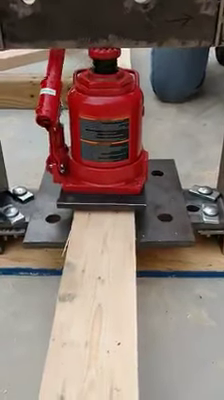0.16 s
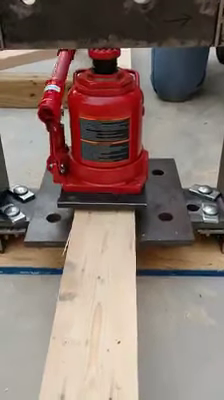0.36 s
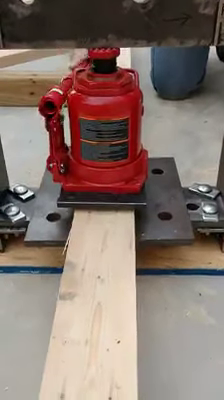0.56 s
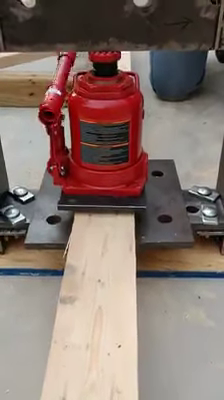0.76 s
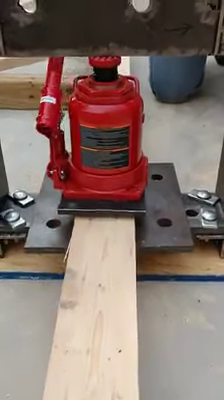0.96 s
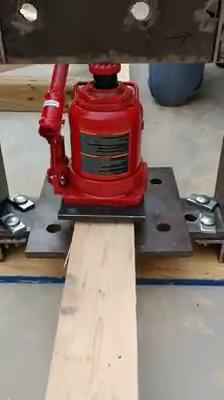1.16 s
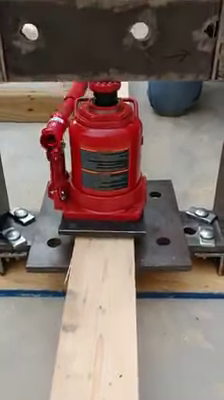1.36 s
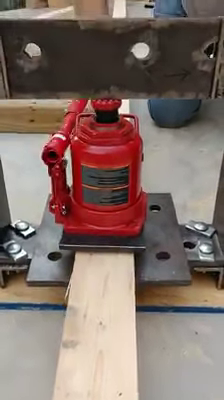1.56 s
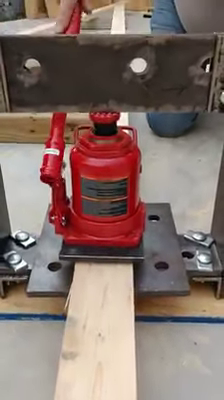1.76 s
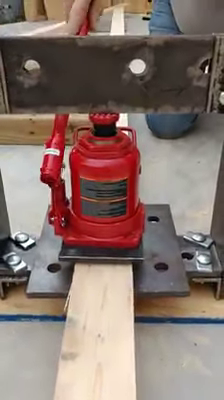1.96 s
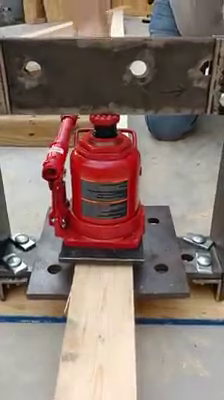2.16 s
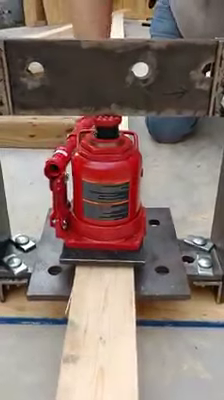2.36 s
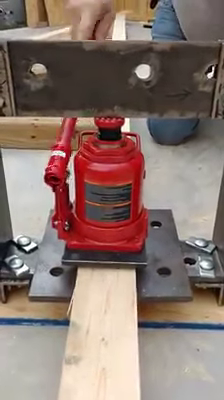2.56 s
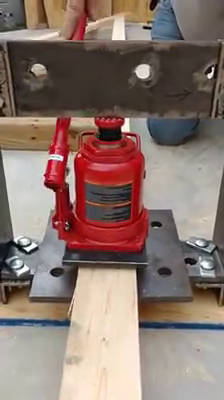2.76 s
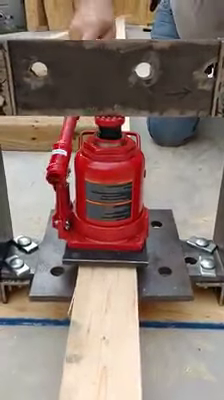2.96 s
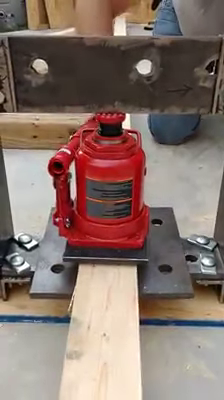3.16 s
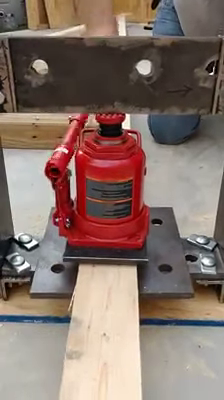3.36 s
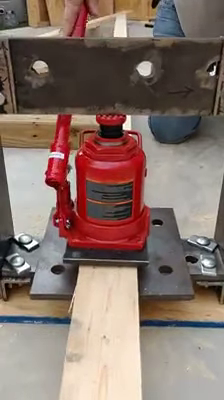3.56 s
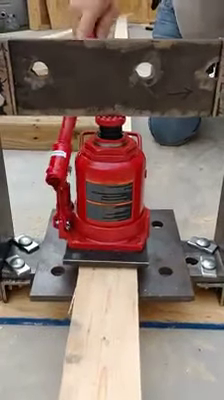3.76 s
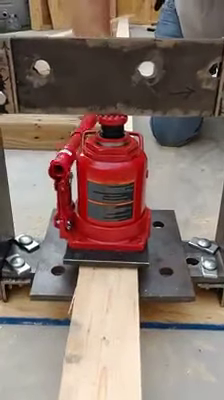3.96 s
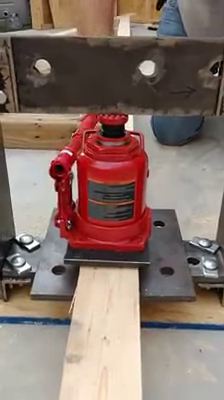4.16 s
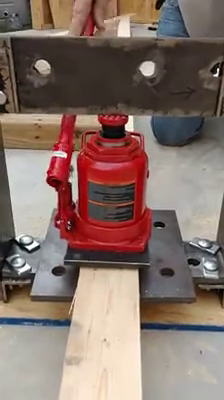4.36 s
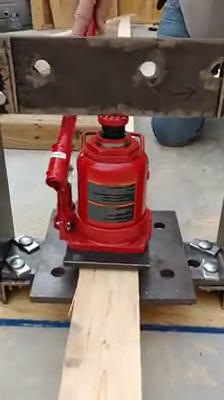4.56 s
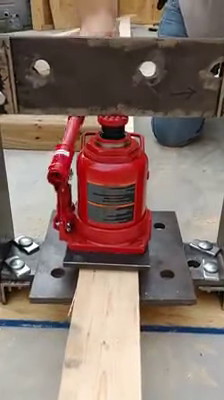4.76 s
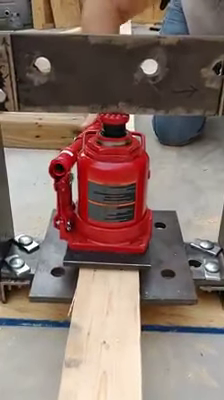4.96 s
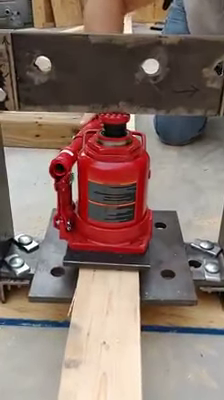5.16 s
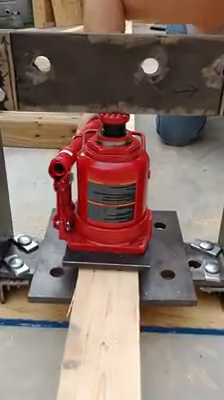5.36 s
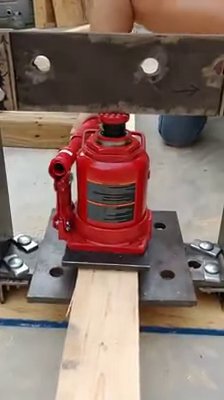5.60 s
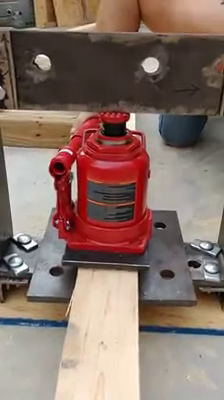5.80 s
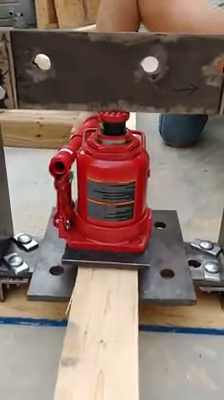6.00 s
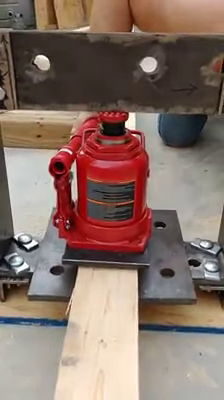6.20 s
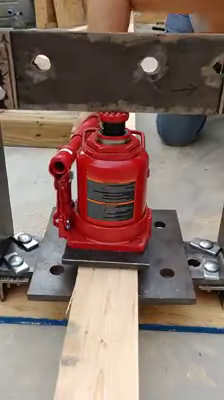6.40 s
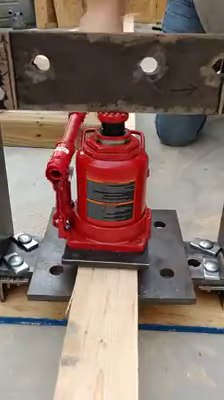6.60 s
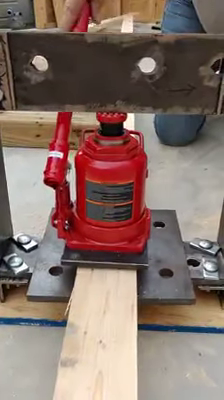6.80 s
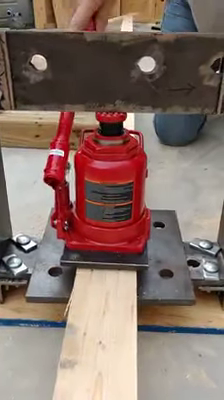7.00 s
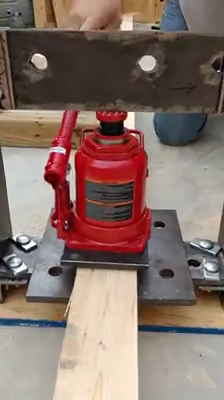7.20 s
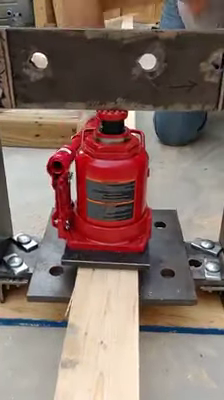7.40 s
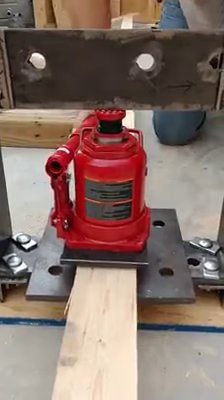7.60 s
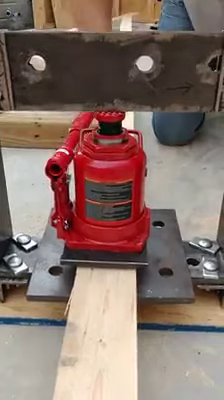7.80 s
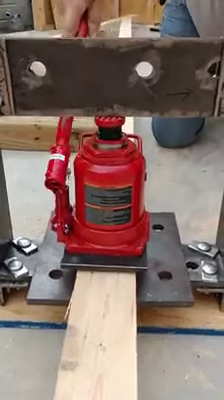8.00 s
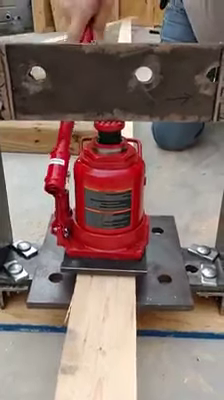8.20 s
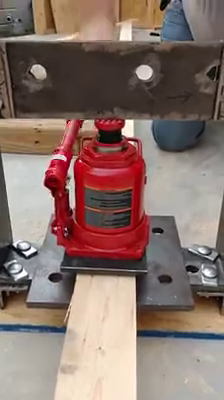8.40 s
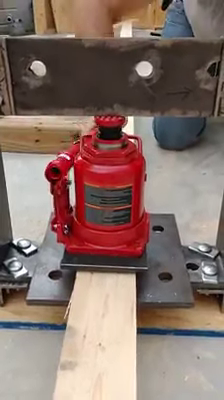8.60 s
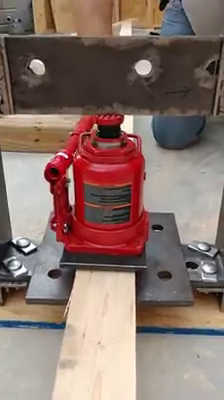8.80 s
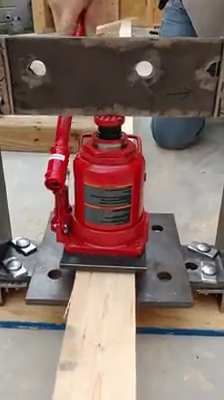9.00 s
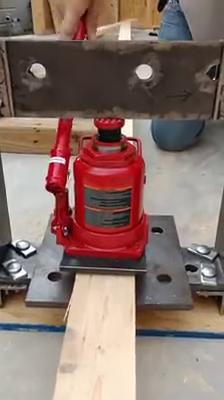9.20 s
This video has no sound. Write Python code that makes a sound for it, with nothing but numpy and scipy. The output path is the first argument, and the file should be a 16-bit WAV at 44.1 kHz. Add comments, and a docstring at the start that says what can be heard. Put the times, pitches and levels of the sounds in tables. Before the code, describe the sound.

A hydraulic jack is pumped by hand in a steel press, close to the microphone. Its loose handle linkage clicks and scrapes in uneven clusters, while the frame and a wooden plank thud dully under the load. The pumping pauses briefly past the middle, then resumes, and the steel gives one loud, ringing crack before a few more clicks. A low hum and fan-like rush fill the workshop behind.

```python
"""Bottle jack in a steel press

A hydraulic jack is pumped by hand, close to a phone in a workshop. The loose handle linkage clicks and
scrapes at each turn of the stroke, frame and plank thud under the load, and once the steel cracks loudly.
Behind it sit a mains hum, a fan-like rush, a brush of cloth and twice a thin whistle.
The phone's gain ducks after sharp blows."""
import sys
import numpy as np
from scipy import signal
from scipy.fft import rfft, irfft, next_fast_len
from scipy.io import wavfile
from scipy.ndimage import uniform_filter1d, map_coordinates

SR = 44100
rng = np.random.default_rng(int(sys.argv[2]) if len(sys.argv) > 2 else 0)


def put_to_file(sound):
    """Save the sound as 16-bit audio at rate SR, in the file named by the first command-line argument."""
    columns = np.atleast_2d(sound).T  # one column per channel
    safe = np.clip(columns, -1, 1)
    whole_steps = np.round(safe * 32767)
    wavfile.write(sys.argv[1], SR, whole_steps.astype(np.int16))


N = 407925

# Linkage clicks; mid and top tilt the tone at 7 and 12 kHz:
# start_s, level_db, mid_db, top_db, pin_pitch_hz, socket_ring_db
CLICK_CUES = [(0.1668, -42.5, -17, -16, 2780, -12), (0.296, -38.5, -23, -30, 2510, -5),
              (0.3425, -32.5, -42, -21, 3450, -19), (0.3516, -39, -3, -19.5, 3320, 8.5),
              (0.3674, -43, -36, -31, 3900, -4), (0.663, -43.5, 11, -1, 3200, -23),
              (0.7103, -43, -5, -12.5, 3600, -19), (0.7683, -35.5, -1, 4.5, 3120, -5),
              (0.79, -25.5, 0.5, 4, 4980, -28), (0.8089, -21, -3, -13, 2880, -5.5),
              (0.8172, -24, -23, -6, 2900, -15), (1.1761, -34.5, -21, -23, 3360, -14),
              (1.2047, -31.5, -18, -21, 4900, -13), (1.2142, -25.5, -16.5, -23, 3800, -12),
              (1.2244, -27, 1, -6, 3650, -2), (1.509, -42.5, 11, -2, 3770, -29),
              (1.5837, -35.5, -3, -9, 3380, -29), (1.6135, -23, -12, 7, 3800, -43),
              (1.6478, -29, -6, -34, 2850, -17), (1.6587, -19, -5, 3, 2960, -32),
              (1.688, -24, -9, -11.5, 2570, -28), (1.711, -32, -13, 0, 2760, -15),
              (2.043, -31.5, -16, -16, 3620, 7.5), (2.058, -39, -9, -8, 3810, -10),
              (2.084, -21.5, -19, -30, 3050, -11), (2.09, -25.5, -10, 1, 3580, 16.5),
              (2.1075, -28, -8, -26, 3770, -19), (2.4482, -35, -2, -12, 4830, -16),
              (2.4838, -20.5, -11, 8, 4300, -28), (2.5398, -8.5, -5, 2.5, 3460, -27),
              (2.907, -33.5, -18, -16, 3300, -15), (2.9125, -27.5, -20, -8, 2880, -13),
              (2.9486, -31, -30, -26, 3180, -14), (2.958, -20.5, -3, -17, 3540, 7),
              (3.3131, -36.5, -2, -9.5, 3260, -20), (3.381, -38.5, 0.5, -2, 3260, -1),
              (3.4054, -26.5, 0, -3, 2800, -27), (3.425, -26.5, -22, -15, 2940, -13),
              (3.4334, -27.5, -9, -19.5, 2930, -19), (3.463, -32.5, -49, -24.5, 2470, -23),
              (3.596, -40.5, -3.5, 4, 3250, -24), (3.7696, -21.5, -25, -9, 3790, -8),
              (3.7854, -34, -15, -15, 3700, -17), (3.8087, -29.5, -26.5, -12, 3670, 4),
              (3.8178, -23, -24, -26, 3370, -20), (4.0503, -47, 9, 12, 2870, -24),
              (4.12, -37, 4, 0, 3360, -14), (4.163, -42, 0, -11, 3600, -14),
              (4.264, -30.5, -9.5, 8, 3420, -12.5), (4.279, -26, -10, -10, 3360, -23),
              (4.3047, -22.5, -26, -16.5, 3210, -20), (4.3125, -25.5, 6.5, -22, 2900, -4),
              (4.3364, -39, -6, -24.5, 3320, -13), (4.4953, -38.5, -10, 2, 4150, -26),
              (4.5232, -28, -19, -23, 3000, -11), (4.6582, -25, -15, -25, 3050, 0),
              (4.6918, -24, -10, -24.5, 3320, -9), (4.699, -19.5, -47, -30, 3480, 5),
              (4.9477, -26.5, -43, -38, 2970, -18), (6.536, -42.5, -16, -24, 2730, -6),
              (6.5707, -43, -9, 1, 3540, -14), (6.5876, -37, -6, -4.5, 2850, -9),
              (6.6096, -31, 1, 2, 4030, -23), (6.6386, -16.5, -15.5, -11, 3210, -19),
              (7.087, -24, -16.5, -28, 4800, -15), (7.11, -25, -11, -2, 3670, -14),
              (7.1217, -35, -21, -23, 3400, -5), (7.1517, -32, -25, -31.5, 3450, 3.5),
              (7.883, -47, -9.5, -3, 3050, -9.5), (7.9093, -35.5, 13, 10, 3360, -22),
              (7.9522, -27.5, -9, -16, 4000, -25), (8.1923, -46.5, -36, -34.5, 2550, -19),
              (8.3, -39.5, -17, -27.5, 3900, -19.5), (8.3378, -34.5, -35.5, -26, 3350, -14),
              (8.3495, -30, -15.5, -19.5, 3800, 6.5), (8.594, -33.5, -22, -23.5, 3275, -13),
              (8.879, -36, -2.5, -4, 3700, -34), (8.918, -32.5, 3, 0.5, 4400, -25),
              (8.9376, -36, -31, -14.5, 3140, -16), (8.9491, -20, -10.5, -15.5, 3470, -35)]
# Ring of the linkage pins: pitch_hz, level_db, t60_s
PIN_MODES = [(2730, -1, 0.049), (3100, -24.5, 0.033), (4000, -4, 0.016), (4680, -7, 0.056),
             (5250, -5, 0.014), (6700, -16, 0.086), (6830, -13, 0.035), (8320, -18, 0.028),
             (11000, -14.5, 0.053), (12120, -8, 0.027)]
# Ring of the handle socket: pitch_hz, level_db, t60_s
SOCKET_MODES = [(3160, -10, .12), (3390, -7, .13), (3510, -7, .12), (3600, -1, .13), (3720, -5, .12),
                (3860, -9, .1)]
# Colour of the scraping pins: frequency_hz, level_db
SCRAPE_COLOUR = [(1500, -32), (2600, 16.5), (3600, -8), (6000, -1), (12000, 8), (16000, -12)]
# Frame and plank thuds; low and high tilt the tone at 260 and 1200 Hz:
# start_s, level_db, low_db, high_db, knock_pitch_hz, burst_t60_s
THUD_CUES = [(0.169, -36, -39, -13.5, 596, 0.096), (0.298, -33, -22, -9, 810, 0.17),
             (0.348, -28, -7, -3, 820, 0.11), (0.363, -26.5, -4.5, -20, 383, 0.089),
             (0.6631, -28, -12.5, -11, 594, 0.092), (0.712, -34, -12, -8, 580, 0.18),
             (0.766, -33, -2, -5, 860, 0.37), (0.791, -35, -28, 4, 860, .1),
             (0.807, -31, -38, 4, 845, 0.31), (1.015, -30, -17, -12, 853, 0.094),
             (1.176, -28, -14, -13, 620, 0.49), (1.219, -17.5, -20, -7, 850, 0.19),
             (1.231, -23, -5, -15, 650, 0.34), (1.544, -22.5, -14.5, -14, 617, 0.12),
             (1.586, -26.5, -12, -11, 610, 0.16), (1.617, -32, -27, -5, 834, 0.98),
             (1.666, -27, -36, -7, 830, 0.45), (2.041, -29.5, -22, -12, 570, 0.97),
             (2.082, -28.5, -5, 7, 806, 0.19), (2.097, -20.5, -4, -12, 830, 0.4),
             (2.408, -21, -18, -18, 630, 0.16), (2.449, -24, -11, -5, 620, 0.34),
             (2.486, -25, -17, -11, 750, 0.17), (2.541, -26, -47, 2, 800, 0.079),
             (2.915, -22, -20, -13, 630, 0.43), (2.959, -16, -6, -5.5, 826, 0.15),
             (3.271, -18, -17, -12, 620, 0.11), (3.314, -23.5, -11, -23, 600, 0.08),
             (3.409, -30.5, -5.5, -5, 870, 0.21), (3.437, -26.5, -22, -8, 870, 0.26),
             (3.464, -17, -24, -19, 644, 0.22), (3.773, -22.5, -12, -20, 804, 0.43),
             (3.805, -21.5, -15, -12, 830, 0.21), (3.82, -16.5, -9, -16, 700, 0.16),
             (3.829, -11.5, -10, -6, 608, 0.2), (3.845, -25, -4, -12, 623, 0.15),
             (4.119, -17, -20, -14, 610, 0.21), (4.243, -28.5, -15, -28, 850, 0.18),
             (4.288, -29.5, -5.5, -6, 745, 0.52), (4.316, -19.5, -24, -8, 1016, 0.059),
             (4.35, -22.5, -20, -28, 665, 0.34), (4.526, -16, -7.5, -37, 652, 0.1),
             (4.657, -29, -7, -14, 715, 0.19), (4.685, -21, -22, -8, 760, 0.29),
             (4.705, -11.5, -12, -7, 622, 0.21), (4.948, -18.5, -9.5, -14, 920, 0.1),
             (5.051, -15.5, -19.5, -14.5, 674, 0.18), (5.168, -20, -11.5, -22, 483, 0.1),
             (5.204, -29, -10, -37, 437, 0.1), (6.536, -32, -25, -12, 830, 0.75),
             (6.575, -30, -11, -10, 840, 0.58), (6.643, -25.5, -40, 5.5, 886, 0.084),
             (7.089, -26.5, -19, -20, 820, 0.073), (7.128, -26, -16, -10, 896, 0.043),
             (7.152, -24, 2.5, -8, 750, 0.13), (7.178, -24.5, -8.5, -25, 482, 0.2),
             (7.253, -26, -21, -7.5, 650, 0.13), (7.581, -27.5, -14, -23, 421, 0.24),
             (7.655, -35, -3, -22, 427, 0.33), (7.744, -37, -3, -31, 422, .2),
             (7.84, -39.5, -1, -20, 496, 0.36), (7.95, -32.5, -32, -10, 815, 0.1),
             (8.194, -34, -9, -25.5, 710, 0.12), (8.301, -35, -8, -20, 806, 0.25),
             (8.349, -20, -12.5, -14.5, 830, 0.12), (8.594, -24, -15, -22.5, 755, 0.058),
             (8.619, -36.5, -1.5, -33, 534, 0.25), (8.713, -29, -12.5, -19, 700, 0.072),
             (8.827, -31, -7, -14.5, 537, 1), (8.948, -25, -25, -3.5, 893, 0.12)]
# Ring of the press frame: pitch_hz, level_db, t60_s
FRAME_MODES = [(264, 1, 0.2), (315.5, -24.5, 0.27), (381.7, -14, 0.4), (407, -15, 0.5), (491, -10, 0.3),
               (527, -9.5, 0.37), (625, -7, 0.18), (714, -3.5, 0.098), (757, -8.5, 0.15), (819.3, -1, 0.15),
               (931, -6, 0.22), (1038, -7, 0.13), (1215, -13, 0.34), (1330, -34, 0.036)]
# A steel part slips and bounces; hardness is the 1-1.7 kHz band: start_s, level_db, hardness_db, treble_db
CRACK_CUES = [(7.4580, 1.5, 0, -9), (7.4632, -6, -25, 14.5), (7.4760, -5.5, -20, -18),
              (7.4845, -3, -29, -16), (7.5295, -7, -12, -10)]
# Ring of the part that slips: pitch_hz, level_db, t60_s
STEEL_MODES = [(420, -27, .15), (510, -26, .1), (754, -18, .08), (830, -16, .07), (620, -14, .05),
               (1130, 4, .013), (1510, -18, .03), (8100, -36, .05), (8840, -39, .28), (10500, -44, .3),
               (10850, -41, .35), (11430, -32, .06), (11800, -36, .06), (9188, -25, .22)]
# Colour of the crack's noise: frequency_hz, level_db
CRACK_COLOUR = [(120, -42), (250, -18), (500, -23), (800, -4), (1200, -6.5), (1600, -25), (2200, -6.5),
                (4500, -20), (7400, -24), (8600, -16), (10600, -22), (12000, -27), (16000, -29.5)]
# Thin rising whistles: start_s, length_s, from_hz, to_hz, level_db
WHISTLE_CUES = [(4.33, 0.49, 4130, 4530, -53.5), (8.422, 0.42, 3980, 4325, -61)]
# Cloth brushes near the phone: peak_s, level_db
CLOTH_CUES = [(5.58, -57), (5.82, -58)]
# Colour of the cloth: frequency_hz, level_db
CLOTH_COLOUR = [(3000, -32), (7000, -8), (12500, 5), (15500, -2), (16000, -23)]
# Fader ride on rush and hum together: time_s, level_db
ROOM_FADER = [(0, -55), (.6, -51), (2.3, -48.5), (3.4, -48.5), (5.1, -45), (5.45, -47.5), (6.5, -49.5),
              (7.3, -50), (8.2, -61), (8.8, -55), (9.25, -51)]
# Colour of the fan-like rush: frequency_hz, level_db
RUSH_COLOUR = [(25, -20), (60, -7), (250, -3), (600, -8.5), (1000, -8), (1350, -9), (1700, -13.5),
               (2200, -18), (4000, -22), (6800, -25.5), (8000, -33), (11000, -34.5), (15300, -33.5),
               (16000, -58)]
# Lines of the hum: pitch_hz
HUM_PITCHES = [71, 83, 120, 142.5, 240, 285]
# Strength of each hum line: over_rush_db, waver_db
HUM_LEVELS = [(-11.5, 5), (-29, 4.5), (-0.5, 1.5), (-10, 4), (-28, 5), (-14, 3.5)]
# The phone's two mic ports agree and disagree along the spectrum: frequency_hz, side_over_mid_db
PORT_WIDTH = [(50, -9), (500, -6), (1150, -18.5), (2170, 18), (3250, -13.5), (4250, 9), (5400, -6.5),
              (6300, 4.5), (7600, -4), (8600, -8), (9700, 8.5), (10750, -10), (11900, 6), (12800, -5),
              (13800, -4), (15000, 5)]

PRE_ROLL_S = .03  # space for the rub ahead of each contact


def linkage_clicks(bus):
    """Pins knock in their loose holes, short and bright; some blows ring the handle socket."""
    for start, db, mid_db, top_db, pin_hz, socket_db in CLICK_CUES:
        tilt = [(3700, 0.0038), (7000, mid_db + 10.5), (12000, top_db + 12.5)]
        colour = [(150, -54), (600, -4), (2000, -7), (3500, 2.5),
                  (7000, mid_db + 7.5), (12000, top_db + 2.5), (15500, top_db + 3)]
        struck_pin = [(pin_hz, 14 + .22 * socket_db, .02)]  # rings harder when the socket does
        socket = [(hz, level + socket_db, t60) for hz, level, t60 in SOCKET_MODES]
        click = impact(PIN_MODES + struck_pin + socket, tilt, colour, length_s=1 / 6, attack_s=0.00051,
                       scatter_db=2, blur=0.32, rub_db=0.5, rub_s=0.0031,
                       burst_db=11, burst_t60=.026, ripple_db=6.5, room_db=-2, room_t60=.22)
        place(bus, start, amp(db - 8) * click)


def pin_scrape():
    """The pins rub: grit that swells into each click and dies away after it."""
    swell_s, tail_s = 0.011, 0.025
    triggers = np.zeros(N)
    for start, db, *_ in CLICK_CUES:
        triggers[round(start * SR)] = amp(db - 20)
    envelope = decay(triggers, tail_s) + decay(triggers[::-1], swell_s)[::-1]
    grain = unit_rms(amp(6 * wobble(350)))
    return envelope * grain * noise(next_fast_len(N), SCRAPE_COLOUR, width=0.26)[:, :N]


def frame_thuds(bus):
    """The load shifts, and frame and plank answer with a dull ring."""
    for start, db, low_db, high_db, hz, t60 in THUD_CUES:
        tilt = [(260, low_db + 9.5), (650, 0.0057), (1200, high_db + 7)]
        colour = [(40, -68), (130, low_db - 16), (260, low_db), (650, -7),
                  (1200, high_db - 5.5), (2200, high_db - 18), (6000, -51.5)]
        knock = [(hz, 10 + 9 * np.log2(hz / 800), .034 * (800 / hz) ** 2)]  # deeper is softer and longer
        thud = impact(FRAME_MODES + knock, tilt, colour, length_s=1 / 5, attack_s=0.0014,
                      scatter_db=2.5, blur=0.1, rub_db=-9, rub_s=0.0046,
                      burst_db=-0.5, burst_t60=t60, ripple_db=5, room_db=-6.5, room_t60=0.34)
        place(bus, start, amp(db - 8.5) * thud)


def steel_crack(bus):
    """A hard steel-on-steel snap with a high ring; the part bounces softly and is damped as it settles."""
    settle_s, damping_db_per_s = 7.585, 600
    for start, db, hardness_db, treble_db in CRACK_CUES:
        tilt = [(850, 0), (1050, hardness_db), (1700, hardness_db), (3000, treble_db)]
        colour = [(hz, level + curve_at(tilt, hz)) for hz, level in CRACK_COLOUR]
        snap = impact(STEEL_MODES, tilt, colour, length_s=1 / 3, attack_s=.0004,
                      scatter_db=1.5, blur=.11, rub_db=-32, rub_s=0.0032,
                      burst_db=-20, burst_t60=.05, ripple_db=-0.5, room_db=-22, room_t60=.22)
        t = start - PRE_ROLL_S + np.arange(snap.shape[1]) / SR
        resting_s = np.clip(t - settle_s, 0, 1)
        place(bus, start, snap * amp(db - damping_db_per_s * resting_s))


def thin_whistle():
    """A wavering tone that climbs quickly, then more slowly; it swells and eases off near its end."""
    t, tone = np.arange(N) / SR, 0
    fade_s = 0.016
    for start, length, from_hz, to_hz, db in WHISTLE_CUES:
        progress = np.clip((t - start) / length, 0, 1)
        hz = from_hz + (to_hz - from_hz) * progress ** .62 + 8 * wobble(12) + 14 * wobble(150)
        gate = np.clip(np.minimum(t - start, start + length - t) / fade_s, 0, 1)
        swell = amp(db + 6 * np.sin(2.4 * progress) + 3 * wobble(12) + 2 * wobble(70))
        tone = tone + gate * swell * np.sin(2 * np.pi * np.cumsum(hz) / SR)
    return tone


def cloth_rustle():
    """Cloth brushes near the phone with a brief, fluttering hiss."""
    t = np.arange(N) / SR
    rise_db_per_s, fall_db_per_s = 670, 180
    envelope = sum(amp(db + np.minimum(rise_db_per_s * (t - peak), fall_db_per_s * (peak - t)))
                   for peak, db in CLOTH_CUES)
    flutter = amp(1.9 * wobble(60))
    return envelope * flutter * noise(next_fast_len(N), CLOTH_COLOUR, width=.5)[:, :N]


def room_tone():
    """The workshop bed: a slightly uneven fan-like rush under wavering lines of hum."""
    t = np.arange(N) / SR
    rush = amp(0.38 * wobble(9)) * noise(next_fast_len(N), RUSH_COLOUR, width=1, ripple_db=3.5)[:, :N]
    hum = sum(amp(db + waver_db * wobble(14)) * np.sin(2 * np.pi * hz * t + 0.23 * wobble(2.59))
              for hz, (db, waver_db) in zip(HUM_PITCHES, HUM_LEVELS))
    return amp(np.interp(t, *np.transpose(ROOM_FADER)) + 4.5) * (rush + hum)


def impact(modes, tilt, colour, length_s, attack_s, scatter_db, blur, rub_db, rub_s,
           burst_db, burst_t60, ripple_db, room_db, room_t60):
    """One contact: a short rub, ringing modes, a noisy burst of dense modes and the workshop's tail."""
    size = next_fast_len(round(length_s * SR))
    t = np.arange(size, dtype=np.float32) / SR - PRE_ROLL_S
    age = np.clip(t, 0, 1)
    hz, db, t60 = np.transpose(np.float32(modes))[:, :, None]
    db = np.float32(db + curve_at(tilt, hz) + scatter_db * rng.standard_normal(hz.shape))
    # Loose parts blur each mode: its phase wanders.
    drift = blur * np.cumsum(rng.standard_normal((len(hz), size // 64 + 1), np.float32), axis=1)
    drift = uniform_filter1d(np.repeat(drift, 64, axis=1), size=64)[:, :size]
    phase = 2 * np.pi * hz * age + drift * (t > .002)
    # Each mode reaches the two mic ports a little differently.
    port_gains = np.float32(1 + 0.24 * rng.standard_normal(len(hz)) * [[0], [1]])
    ring = port_gains @ (amp(db - 60 * age / t60) * np.sin(phase))
    attack = 1 - np.exp(-age / attack_s)
    rub = amp(rub_db) * np.exp(-abs(t) / rub_s)
    burst = attack * amp(burst_db - 60 * age / burst_t60)
    contact = (burst + rub) * noise(size, colour, 0.77, ripple_db)
    bloom = 1 - np.exp(-age / 0.0081)
    fade_out = np.clip((t[-1] - t) / 0.0096, 0, 1)
    octaves_up = np.log2(np.clip(np.fft.rfftfreq(size, 1 / SR) / 4000, 1, None))
    dull_wash = irfft(amp(-5 * octaves_up) * rfft(noise(size, colour, 0.3, ripple_db / 2)), size)
    tail = amp(room_db - 60 * age / room_t60) * bloom * fade_out * dull_wash
    return ring * attack + contact + tail


def noise(size, colour, width, ripple_db=0):
    """Coloured stereo noise at unit rms; ripples in its spectrum stand for crowds of modes."""
    mid, side, bumps = rng.standard_normal((3, size))
    pair = np.array([mid + width * side, mid - width * side])
    ripple = unit_rms(uniform_filter1d(uniform_filter1d(bumps[:size // 2 + 1], size=30), size=30))
    eq_db = curve_at(colour, np.fft.rfftfreq(size, 1 / SR)) + ripple_db * ripple
    return unit_rms(irfft(rfft(pair) * amp(eq_db), size))


def place(bus, start_s, hit):
    """Mix a hit into the bus with its contact landing on start_s."""
    bus[:, round((start_s - PRE_ROLL_S) * SR):][:, :hit.shape[1]] += hit


def wobble(rate_hz):
    """A smooth random modulator."""
    return map_coordinates(rng.standard_normal(int(N * rate_hz / SR) + 4), [np.arange(N) * rate_hz / SR])


def decay(triggers, time_s):
    """Give each trigger an exponential tail."""
    return signal.lfilter([1], [1, -np.exp(-1 / (time_s * SR))], triggers)


def curve_at(points, hz):
    """Read an EQ curve on a log frequency axis."""
    points_hz, points_db = np.transpose(points)
    return np.interp(np.log(hz + 1), np.log(points_hz + 1), points_db)


def amp(db):
    return 10 ** (np.asarray(db) / 20)


def unit_rms(x):
    return x / np.sqrt(np.mean(x ** 2, axis=-1, keepdims=True) + 1e-20)


def gain_ducking(x):
    """Sharp blows pull the phone's gain down just after they land; it creeps back at a steady rate."""
    threshold_db, slope, release_db_per_s, attack_s = -31.5, 0.52, 7.2, 0.026
    window = 441  # 10 ms, both to average and to react late
    sidechain = signal.sosfilt(signal.butter(2, 2010, "high", fs=SR, output="sos"), x)
    level_db = 10 * np.log10(abs(uniform_filter1d(np.mean(sidechain ** 2, axis=0), size=window)) + 1e-12)
    over_db = np.clip(level_db - threshold_db, 0, None)
    release = release_db_per_s * np.arange(N) / SR
    cut_db = np.maximum.accumulate(slope * over_db + release) - release
    late_cut_db = np.pad(cut_db, (window, 0))[:N]
    lag = np.exp(-1 / (attack_s * SR))
    return x * amp(-signal.lfilter([1 - lag], [1, -lag], late_cut_db))


def scene():
    """Jack and press up front, the workshop behind."""
    press = np.zeros((2, N + SR))
    linkage_clicks(press)
    frame_thuds(press)
    steel_crack(press)
    return press[:, :N] + pin_scrape() + room_tone() + thin_whistle() + cloth_rustle()


def record(dry):
    """The phone ducks, trims deep bass, splits each frequency into mid and side, clips and cuts the top."""
    low_cut_hz, high_cut_hz = 40, 16300
    size = next_fast_len(N + SR // 4)
    hz = np.fft.rfftfreq(size, 1 / SR)
    angle = np.arctan(amp(np.interp(hz, *np.transpose(PORT_WIDTH))))
    low_cut = (1j * hz / (low_cut_hz + 1j * hz)) ** 2
    port_a, port_b = rfft(gain_ducking(dry), size) * low_cut
    mid, side = np.cos(angle) * port_a, -1j * np.sin(angle) * port_b
    clipped = np.clip(irfft([mid + side, mid - side], size), -.97, .97)
    return irfft(rfft(clipped) * (hz < high_cut_hz), size)[:, :N]


dry = scene()
out = record(dry)
put_to_file(out)
```